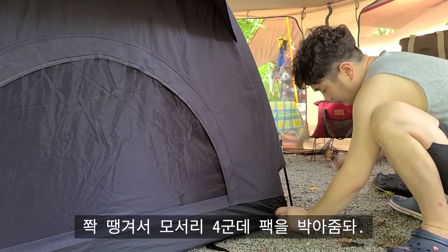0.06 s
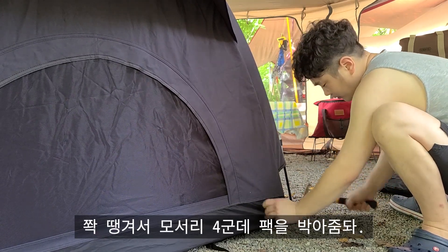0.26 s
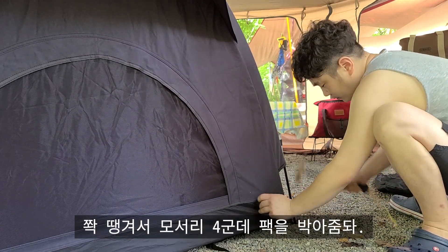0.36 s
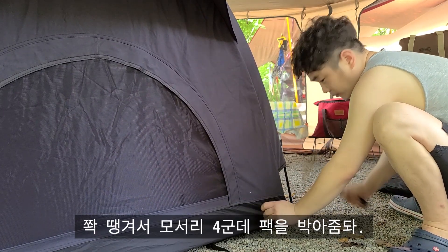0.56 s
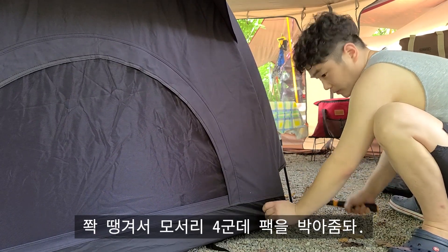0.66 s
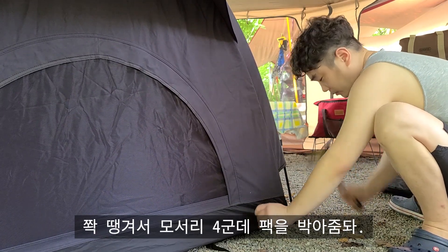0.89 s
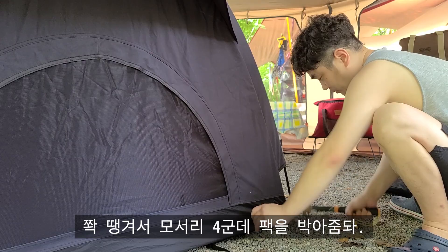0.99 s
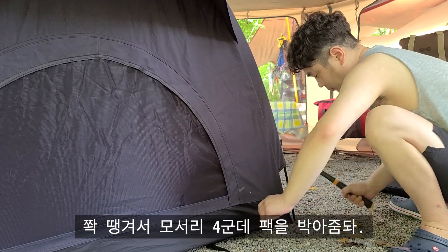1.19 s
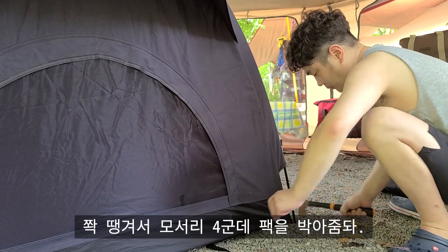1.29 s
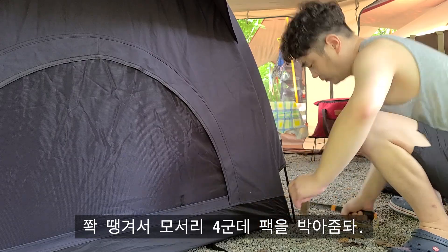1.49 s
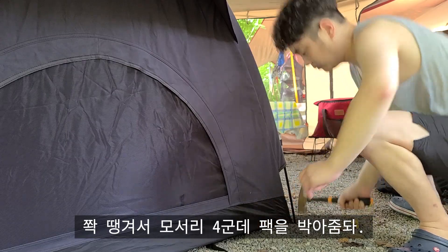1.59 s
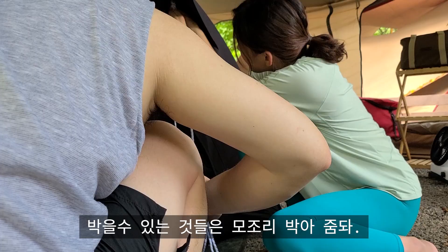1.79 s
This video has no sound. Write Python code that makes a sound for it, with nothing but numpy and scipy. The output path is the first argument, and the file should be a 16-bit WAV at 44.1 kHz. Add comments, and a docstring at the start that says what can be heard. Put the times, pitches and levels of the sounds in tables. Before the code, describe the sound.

A hammer strikes a metal tent peg five times, close up, each blow a sharp short clank with a high clink, gritty crunch and low thud; a quiet campsite with faint cicada and insect hiss lies behind.

```python
"""Hammering a tent peg

A steel hammer drives a tent peg into gravelly ground with five blows, under a tarp at a campsite.
Each blow sums decaying modes of peg and hammer head, decaying coloured noise for crack, clank and head blur,
random grains for the crunch of grit, and low sines for thud and boom of the soil.
Behind it are low outdoor rumble and insect hiss (coloured noise), a cicada calling in even notes (harmonics
through a sinking resonance), two soft cloth rustles and a short burst at the very end (swelling noise)."""
import sys
import numpy as np
from scipy import signal
from scipy.fft import rfft, irfft
from scipy.io import wavfile
from scipy.ndimage import uniform_filter1d

SR = 44100
rng = np.random.default_rng(int(sys.argv[2]) if len(sys.argv) > 2 else 0)


def waveform_to_disk(signal):
    """Save audio, clipped to [-1, 1], as 16-bit WAV at the path in sys.argv[1]."""
    frames = np.transpose(np.atleast_2d(signal))
    scaled = np.clip(frames, -1, 1) * 32767
    samples = np.round(scaled).astype(np.int16)
    wavfile.write(sys.argv[1], SR, samples)


N = 81585
TIME = np.arange(N) / SR

# hammer blows: t/s, clank level/dB, head level/dB, grit level/dB, thud level/dB, boom level/dB,
# clank decay t60/s, first bending mode f/Hz, its level/dB, second bending mode f/Hz, its level/dB,
# frequency ratio of the upper peg modes
BLOWS = [(0.2240, -14.5, -12, -22.5, -21.5, -28, 0.096, 1060, -28.5, 2105, -27, 1.01),
         (0.5607, -17, -14, -16, -28.5, -29, 0.11, 1028, -27, 2055, -36, 1.08),
         (0.9140, -17, -31, -17, -16.5, -20.5, 0.063, 1072, -30, 1877, -31, .925),
         (1.2655, -18, -21.5, -19.5, -23, -26.5, 0.071, 1097, -23, 1907, -26.5, .99),
         (1.4729, -17.5, -18, -30, -27, -21.5, 0.064, 1125, -22, 1810, -33.5, 1.2)]
CRACK_T60_S = 0.008   # first contact of peg and hammer head
TAIL_DB, TAIL_T60_S = -24.5, 0.5   # far reflections, relative to the diffuse sound


def from_db(db):
    """Level to amplitude: 20 dB is a factor of ten."""
    return 10 ** (np.asarray(db) / 20)


def rms_one(x):
    """Normalise the mean power to 1."""
    return x / np.sqrt(np.mean(x ** 2) + 1e-20)


def at_hz(points, hz):
    """Interpolate a table linearly on a logarithmic frequency axis."""
    f, v = np.transpose(points)
    return np.interp(np.log(hz + 1), np.log(f), v)


def colour(x, spectrum):
    """Linear filtering: weight each frequency of a steady signal, then normalise to rms 1."""
    n = x.shape[-1]
    gain = from_db(at_hz(spectrum, np.fft.rfftfreq(n, 1 / SR)))
    return rms_one(irfft(rfft(x) * gain, n))


def air_noise(spectrum):
    """Diffuse field: mid and side noise set the left-right correlation, high only in the bass."""
    # left-right correlation of diffuse sound: f/Hz, correlation (-1 to 1)
    likeness = [(60, .97), (130, 0.95), (290, 0.8), (640, 0.22), (1400, -0.38), (3000, 0.046),
                (15000, -0.04)]
    alike = np.clip(at_hz(likeness, np.fft.rfftfreq(N, 1 / SR)), -1, 1)
    mid, side = rfft(rng.standard_normal((2, N)))
    stereo = np.sqrt(1 + alike) * mid + np.sqrt(1 - alike) * side * [[1], [-1]]
    return colour(irfft(stereo, N), spectrum)


def from_right(x):
    """Arrival-time difference: a direct sound reaches the left microphone a little later."""
    left_lag_s = 0.00012
    return np.array([np.interp(TIME - left_lag_s, TIME, x), x])


def decay(start, t60, rise=0.0001):
    """Damped energy: a quick linear rise under an exponential fall of 60 dB in t60 seconds."""
    t = np.maximum(TIME - start, 0)
    fall = np.exp(-np.minimum(np.log(1000) * t / t60, 50))
    return np.minimum(t / rise, 1) * fall


def swell(start, length, edge):
    """Gradual onset and release: sine-shaped fades around a steady hold."""
    to_edge = np.minimum(TIME - start, start + length - TIME)
    return np.sin(np.pi / 2 * np.clip(to_edge / edge, 0, 1))


def wobble(n, size):
    """Slow random fluctuation: noise averaged twice over size points, rms 1."""
    return rms_one(uniform_filter1d(uniform_filter1d(rng.standard_normal(n), size), size))


def ring(modes, start, ratio=1, rise=0.00011, spread_db=2.0):
    """Modal synthesis: reflections give each struck mode its own level and phase at each microphone."""
    out, i = np.zeros((2, N)), int(start * SR)
    t = TIME[:min(N - i, SR // 3)]
    for hz, db, t60 in modes:
        # the phase difference between the microphones widens with frequency
        half_shift = min(hz / 3000, 0.8) * rng.uniform(0.26, 1.98)
        phase = rng.uniform(0, 2 * np.pi) + half_shift * np.array([[-1], [1]])
        gain = from_db(db + spread_db * rng.standard_normal((2, 1))) * np.minimum(t / rise, 1)
        oscillation = np.sin(2 * np.pi * hz * ratio * t + phase)
        out[:, i:i + len(t)] += gain * oscillation * np.exp(-np.log(1000) * t / t60)
    return out


def scatter(start, t60):
    """Incoherent summation: the energy of each reflection adds a step to the diffuse decay."""
    # reflections of a blow off the tent and the tarp: delay t/s, level/dB
    echoes = [(.0052, -1.5), (0.0233, -10)]
    energy = decay(start, t60) ** 2
    for delay, db in echoes:
        energy = energy + (from_db(db) * decay(start + delay, t60)) ** 2
    return np.sqrt(energy)


def campsite():
    """Many distant sources merge into steady noise: low outdoor rumble and a far chorus of insects."""
    # spectrum of the outdoor rumble: f/Hz, relative level/dB
    rumble = [(20, -30), (35, -8), (60, -9.5), (115, -1), (160, -3.5), (195, -4.5), (245, -7.5), (310, -6),
              (420, -8), (550, -11.5), (750, -15), (1500, -17), (2500, -20), (8000, -42), (16000, -55)]
    # spectrum of the insect chorus: f/Hz, relative level/dB
    insects = [(2000, -18.5), (3200, -1.5), (4300, 0), (6200, -4), (7600, -6.5), (9200, -27),
               (11000, -10.5), (12500, 0), (15500, -0.5)]
    rumble_db, insects_db = -47.5, -46.5
    return from_db(rumble_db) * air_noise(rumble) + from_db(insects_db) * air_noise(insects)


def cicada():
    """Source and resonator: two tymbals click in turn into the abdomen, whose resonance sinks in each note."""
    # cicada notes: t/s, length t/s, level/dB, tymbal rate f/Hz, unevenness of the two tymbals (0-1),
    # resonance at the start f/Hz
    notes = [(0.128, 0.174, -46.5, 188, 0.8, 4800), (0.57, 0.17, -50.5, 196, .6, 4900),
             (1.014, 0.24, -50, 190, .2, 4440), (1.478, 0.21, -49.5, 193.2, 0, 4700)]
    sag_hz_per_s, width_hz = 2600, 340   # abdominal resonance
    rate_jitter, flicker_db, edge_s = 0.004, 3, 0.04
    out = np.zeros((2, N))
    for s, length, db, hz, uneven, start_hz in notes:
        turn = 2 * np.pi * np.cumsum(hz * (1 + rate_jitter * wobble(N, size=500))) / SR
        on = (TIME > s) & (TIME < s + length)
        centre = start_hz - sag_hz_per_s * (TIME[on] - s)
        buzz = 0
        for k in range(17, 36):
            body = 1 / np.sqrt(1 + (2 * (k * hz - centre) / width_hz) ** 2)
            # distance makes the harmonics flicker
            flicker = from_db(flicker_db * wobble(N, size=700)[on])
            # equal tymbals cancel the odd harmonics
            strength = uneven if k % 2 else 1
            line = np.sin(k * turn[on] + rng.uniform(0, 2 * np.pi, (2, 1)))
            buzz = buzz + strength * body * flicker * line
        out[:, on] += from_db(db) * swell(s, length, edge_s)[on] * rms_one(buzz)
    return out


def peg():
    """Impact excitation: a crack, bending modes that shift as the peg sinks, and a rough scattered clank."""
    # upper modes of the peg: f/Hz, relative level/dB, decay t60/s
    upper_modes = [(510.2, -24.5, 0.22), (833, -17, 0.076), (1343, -14, 0.049), (1695, -31, 0.078),
                   (2296, -12, 0.067), (2838, -14.5, 0.14), (3210, -16, .09), (3953, -9.5, 0.064),
                   (4570, -22.5, 0.17), (4940, -11.5, 0.11), (6100, -25, 0.037), (6220, -13, 0.088)]
    # spectrum of crack and clank: f/Hz, relative level/dB
    clank_spectrum = [(120, -7), (230, -7), (300, 4.5), (400, -14.5), (510, -4), (680, -7.5), (850, -4.5),
                      (1100, -7.5), (1500, -8.5), (1750, 4), (3300, -2), (6000, 0), (8500, -5),
                      (10500, -5.5), (15500, -4)]
    crack_db, upper_db, scatter_db = 3.5, -2, -1   # relative to the clank level of the blow
    direct_share = 0.28   # share of the clank's energy that is direct sound
    ripple_db, ripple_full_hz = 3.6, 3200   # dense upper modes leave peaks and gaps in the clank
    crunch_db = 0.5   # unevenness of the clank in time
    first_t60_s, second_t60_s = 0.065, 0.115
    twin_ratio, twin_db = 1.045, -5.5   # the peg bends in two planes, at slightly different pitches

    direct = from_right(colour(rng.standard_normal(N), clank_spectrum))
    clank_direct = from_right(colour(rng.standard_normal(N), clank_spectrum))
    clank_diffuse = air_noise(clank_spectrum)
    clank = np.sqrt(direct_share) * clank_direct + np.sqrt(1 - direct_share) * clank_diffuse
    ripple_depth = ripple_db * np.minimum(np.fft.rfftfreq(N, 1 / SR) / ripple_full_hz, 1) ** 2
    crunch = from_db(crunch_db * wobble(N, size=90))
    out = 0
    for s, clank_db, _, _, _, _, t60, first_hz, first_db, second_hz, second_db, ratio in BLOWS:
        ripple = from_db(ripple_depth * wobble(N // 2 + 1, size=220))
        rippled = rms_one(irfft(rfft(clank) * ripple, N))
        tail = from_db(TAIL_DB) * decay(s, TAIL_T60_S, rise=0.024)
        scattered = from_db(scatter_db) * rippled * (crunch * scatter(s, t60) + tail)
        crack = from_db(crack_db) * direct * decay(s, CRACK_T60_S)
        upper = from_db(upper_db) * ring(upper_modes, s, ratio, spread_db=1.0)
        out = out + from_db(clank_db) * (crack + upper + scattered)

        bends = [(first_hz, first_db, first_t60_s), (second_hz, second_db, second_t60_s)]
        twins = from_db(twin_db) * ring(bends, s, twin_ratio, spread_db=9)
        out = out + ring(bends, s, spread_db=0.5) + twins
    return out


def hammer_head():
    """Free vibration of a stiff body: the steel head clinks in two mode clusters, blurred by reflections."""
    # hammer head modes: f/Hz, relative level/dB, decay t60/s
    head_modes = [(6990, -4, .15), (7080, -7, .11), (7308, -12, .14), (7608, 1.5, .14), (7660, -5, .17),
                  (7897, -12, .1), (8269, -14, .11), (11850, -14, .1), (11925, -13, .1), (12143, -9, .13),
                  (12240, -12, .12), (12463, -12, .11)]
    # spectrum of the crack and of the reflected head ring: f/Hz, relative level/dB
    blur_spectrum = [(5000, -30), (6500, -11), (7020, 0.5), (7330, -7), (7650, 5), (8000, -8.5),
                     (8550, -44), (9450, -2.5), (10500, -33), (11400, -9), (12100, -4.5), (12550, -8.5),
                     (13200, -33), (16000, -40)]
    crack_db, clink_db, blur_db = 3, -8, -3   # relative to the head level of the blow
    blur_t60_s = 0.095
    blur = air_noise(blur_spectrum)
    direct = from_right(colour(rng.standard_normal(N), blur_spectrum))
    out = 0
    for s, _, head_db, *_ in BLOWS:
        tail = from_db(TAIL_DB) * decay(s, TAIL_T60_S, rise=0.033)
        crack = from_db(crack_db) * direct * decay(s, CRACK_T60_S)
        clink = from_db(clink_db) * ring(head_modes, s, rise=0.0012, spread_db=2.0)
        blurred = from_db(blur_db) * blur * (scatter(s, blur_t60_s) + tail)
        out = out + from_db(head_db) * (crack + clink + blurred)
    return out


def grit():
    """Granular friction: the peg slips deeper and grinds past small stones, a train of random impulses."""
    # spectrum of the grains: f/Hz, relative level/dB
    grit_spectrum = [(800, -10), (2500, -4), (5000, -10), (9500, -12), (12000, 10.5), (13500, 5),
                     (15500, 4)]
    grains_per_s, grain_spread_db = 4500, 2.5
    t60_s, rise_s = 0.13, 0.0029
    struck = rng.random((2, N)) < grains_per_s / SR
    sign = rng.choice([-1, 1], (2, N))
    grains = struck * sign * from_db(grain_spread_db * rng.standard_normal((2, N)))
    envelope = sum(from_db(db) * decay(s, t60_s, rise_s) for s, _, _, db, *_ in BLOWS)
    return colour(grains, grit_spectrum) * envelope


def soil():
    """Damped resonance of the ground: a short thud in two modes and a deeper, slower-rising boom."""
    thud_hz, thud_t60_s = 183, 0.08
    thump_hz, thump_t60_s, thump_db = 135, 0.072, -7   # lower mode, relative to the thud
    boom_hz, boom_t60_s, boom_rise_s = 71.3, 0.12, 0.024
    out = 0
    for s, _, _, _, thud_db, boom_db, *_ in BLOWS:
        turn = 2 * np.pi * (TIME - s)
        thud = np.sin(thud_hz * turn) * decay(s, thud_t60_s, rise=0.0042)
        thump = from_db(thump_db) * np.sin(thump_hz * turn) * decay(s, thump_t60_s, rise=0.0032)
        boom = np.sin(boom_hz * turn) * decay(s, boom_t60_s, boom_rise_s)
        out = out + from_db(thud_db) * (thud + thump) + from_db(boom_db) * boom
    return out


def rustles_and_burst():
    """Amplitude-modulated noise: two soft cloth rustles, then a short burst of noise at the very end."""
    # two cloth rustles and the final burst: t/s, length t/s, level/dB
    swells = [(1.01, .27, -46), (1.3, .15, -53), (1.825, .06, -43)]
    # spectrum shared by the rustles and the burst: f/Hz, relative level/dB
    noise_spectrum = [(300, 1), (1000, -7), (2700, -12.5), (4500, -5.5), (6500, 3), (9000, -6), (12000, 8),
                      (15500, -10)]
    flicker_db = 1.5
    flicker = from_db(flicker_db * rms_one(uniform_filter1d(rng.standard_normal(N), size=400)))
    envelope = sum(from_db(db) * swell(s, length, length * 0.28) for s, length, db in swells)
    return air_noise(noise_spectrum) * flicker * envelope


def scene():
    """Superposition: the blows, slightly louder on the left, in front of the campsite."""
    pan_db = 1.1   # left-right level difference
    pan = from_db(np.array([[pan_db], [-pan_db]]) / 2)
    background = campsite() + cicada()
    blows = pan * (peg() + hammer_head() + grit()) + soil()
    return background + blows + rustles_and_burst()


def record(dry):
    """Band limiting and saturation: deepest bass dropped, peaks rounded, top cut steeply."""
    low_cut_hz, cutoff_hz = 28, 15750
    top = 1.2   # ceiling of the rounded peaks
    high_pass = signal.butter(2, low_cut_hz, "high", fs=SR, output="sos")
    low_pass = signal.ellip(12, 0.1, 80, cutoff_hz, fs=SR, output="sos")
    x = signal.sosfilt(high_pass, dry)
    rounded = top * np.tanh(x / top)
    return signal.sosfilt(low_pass, rounded)


dry = scene()
out = record(dry)
waveform_to_disk(out)
```